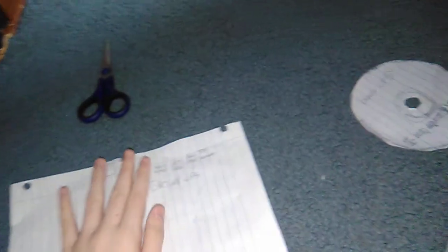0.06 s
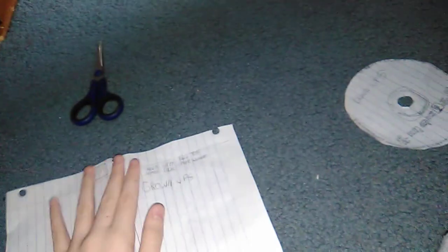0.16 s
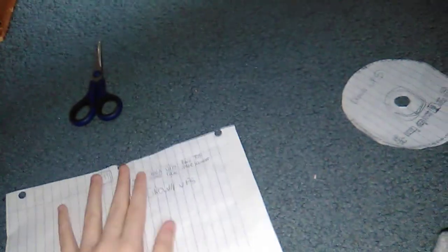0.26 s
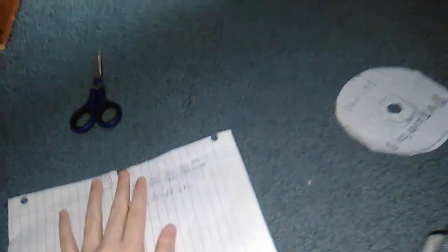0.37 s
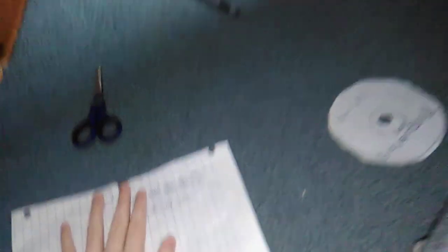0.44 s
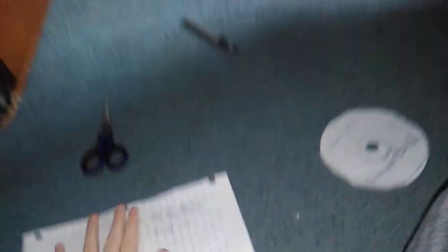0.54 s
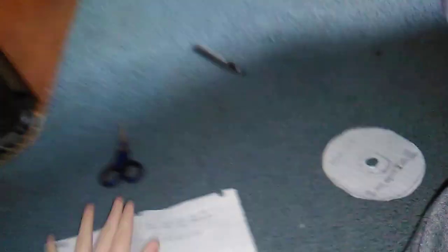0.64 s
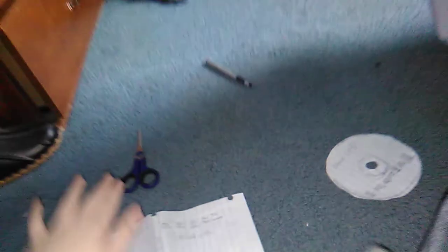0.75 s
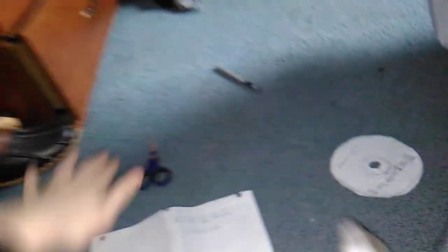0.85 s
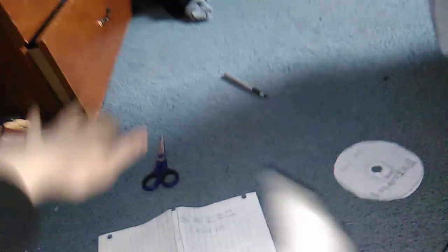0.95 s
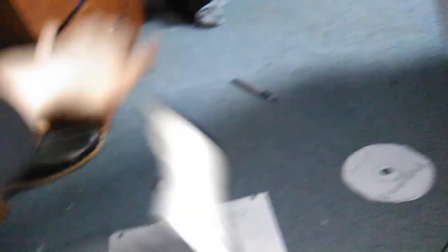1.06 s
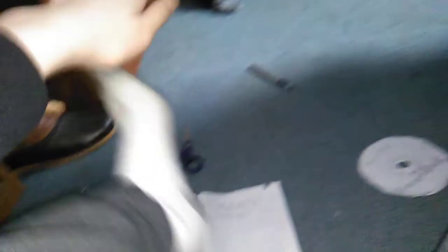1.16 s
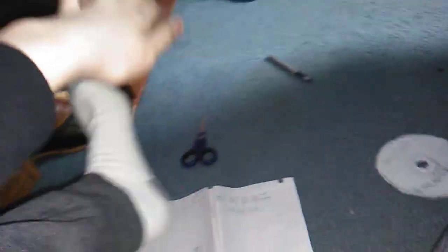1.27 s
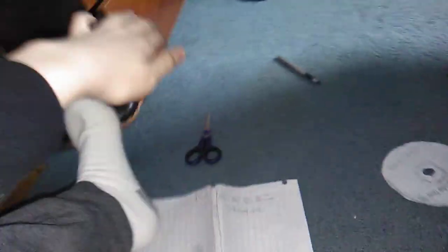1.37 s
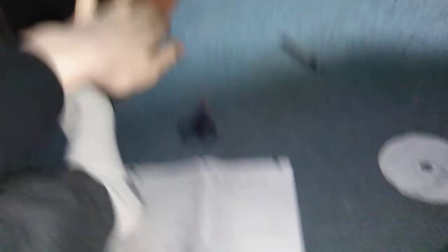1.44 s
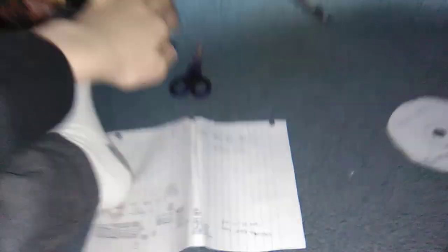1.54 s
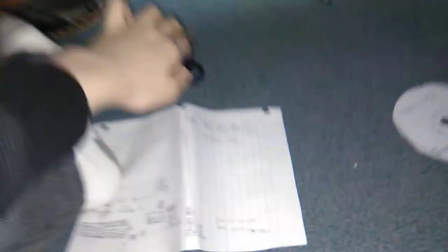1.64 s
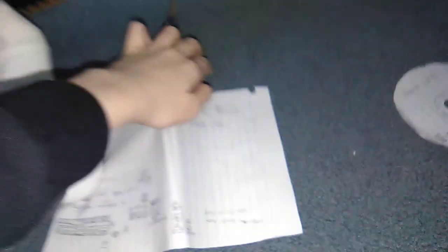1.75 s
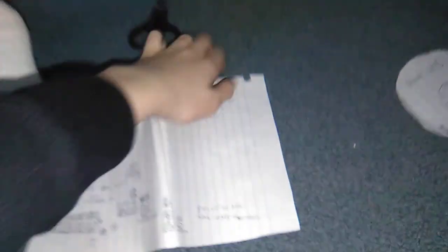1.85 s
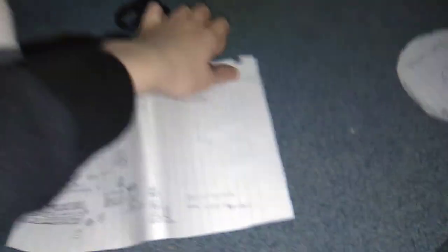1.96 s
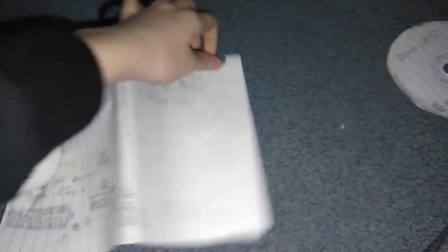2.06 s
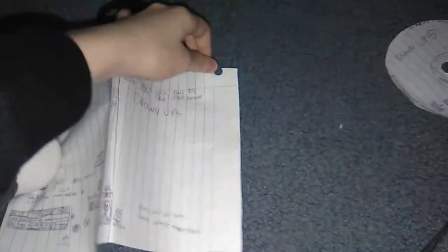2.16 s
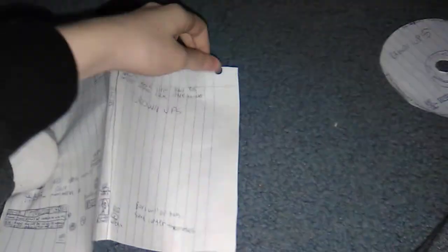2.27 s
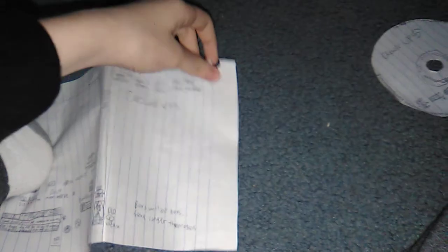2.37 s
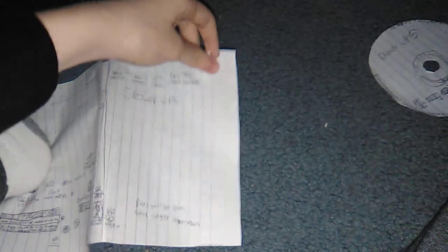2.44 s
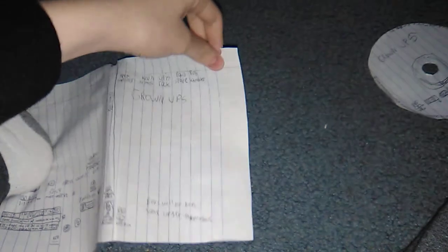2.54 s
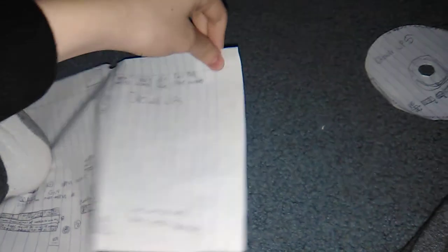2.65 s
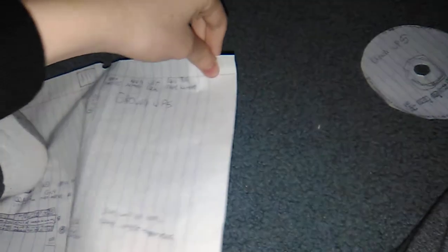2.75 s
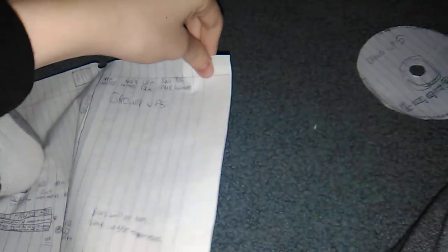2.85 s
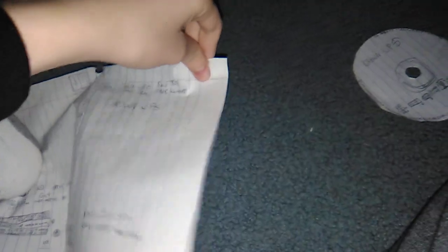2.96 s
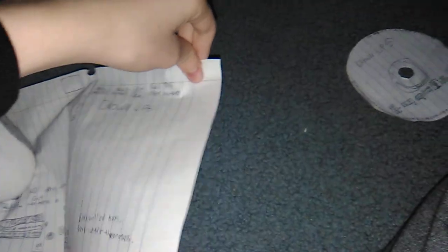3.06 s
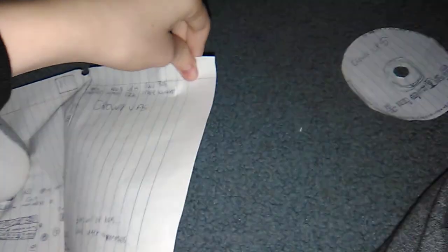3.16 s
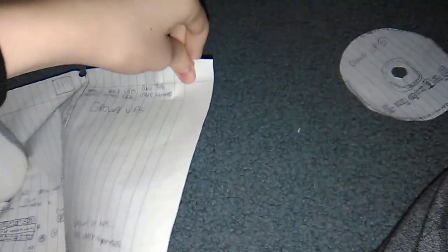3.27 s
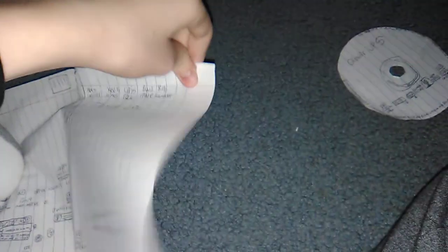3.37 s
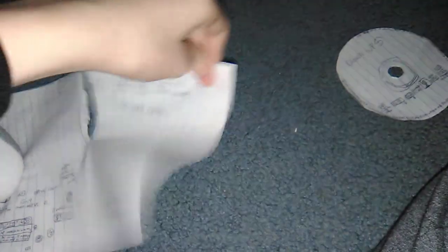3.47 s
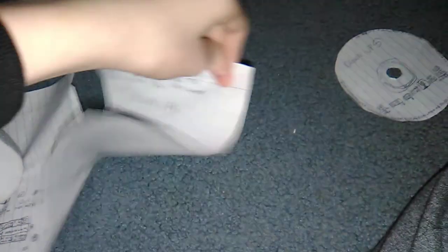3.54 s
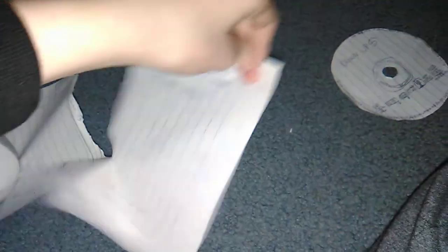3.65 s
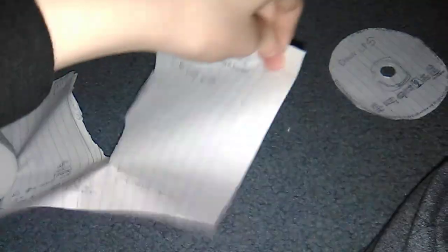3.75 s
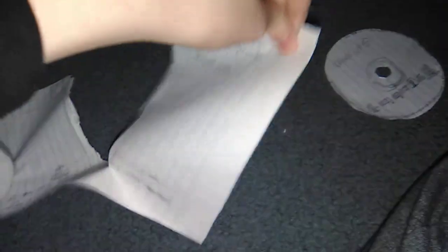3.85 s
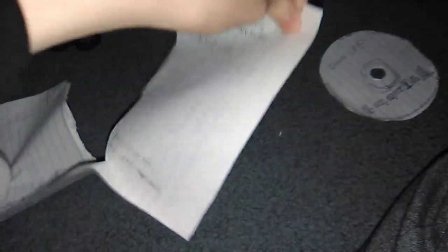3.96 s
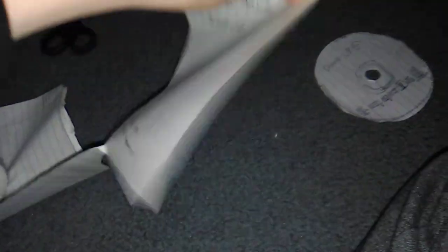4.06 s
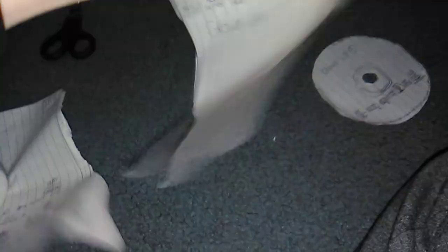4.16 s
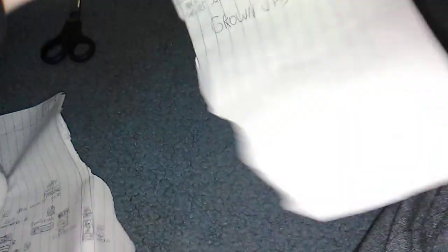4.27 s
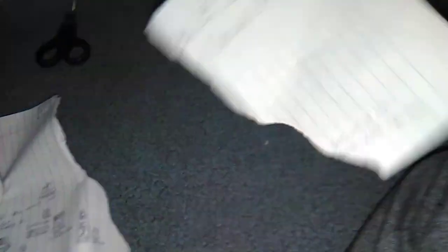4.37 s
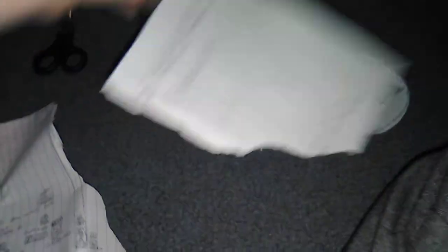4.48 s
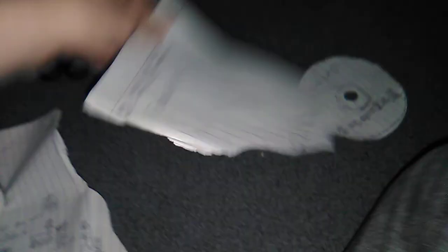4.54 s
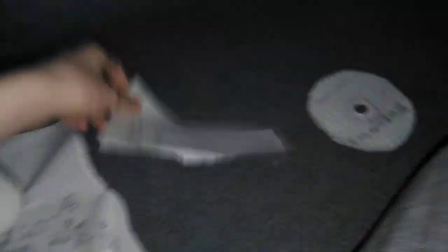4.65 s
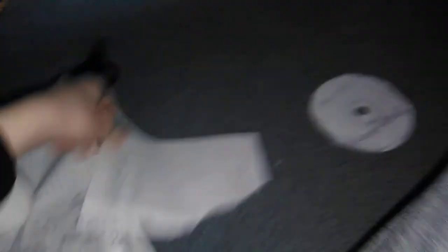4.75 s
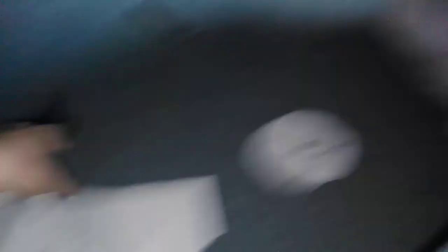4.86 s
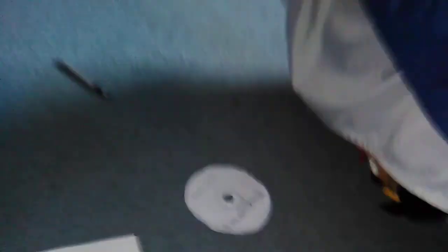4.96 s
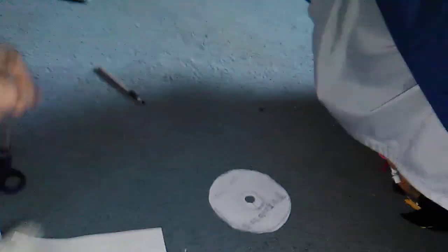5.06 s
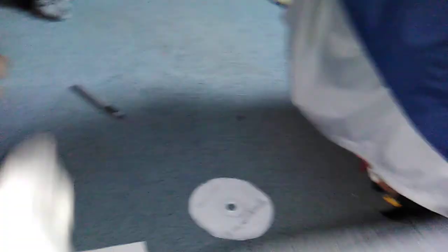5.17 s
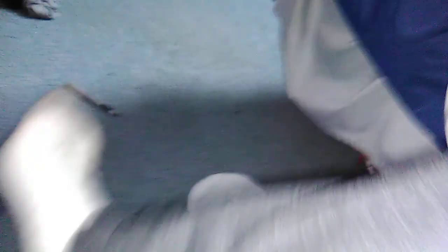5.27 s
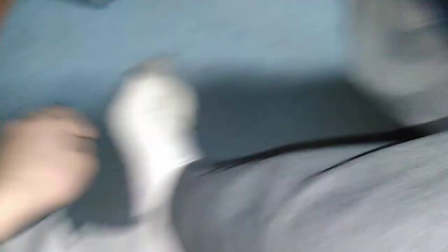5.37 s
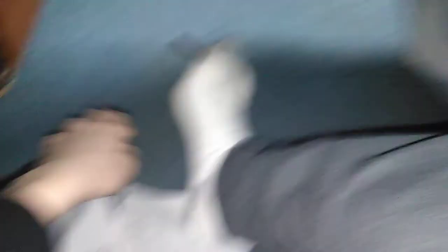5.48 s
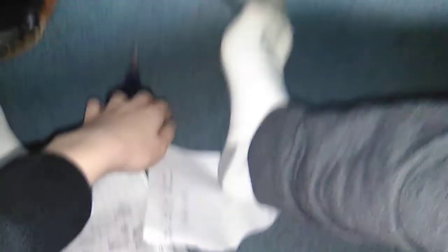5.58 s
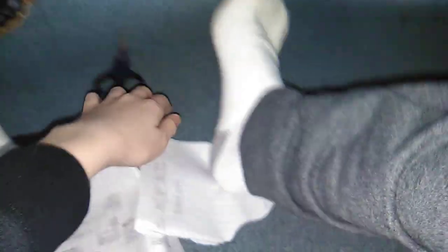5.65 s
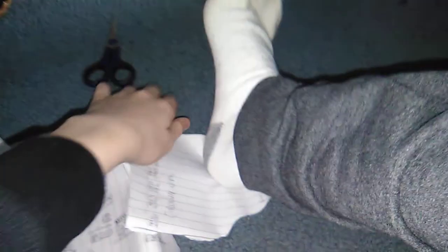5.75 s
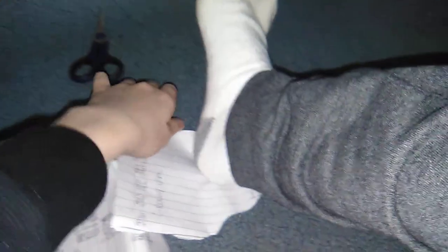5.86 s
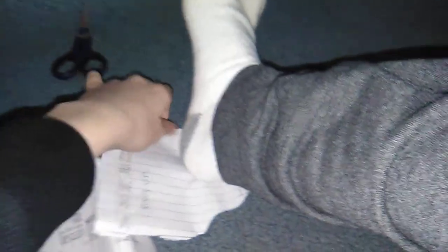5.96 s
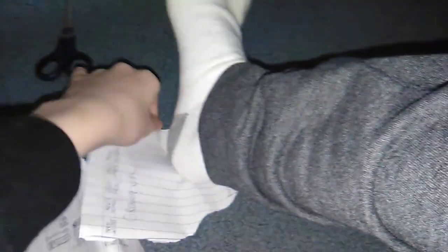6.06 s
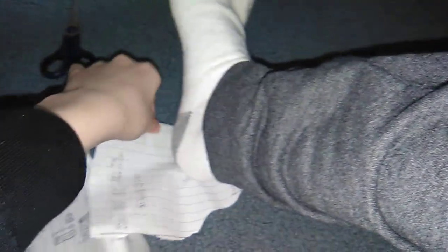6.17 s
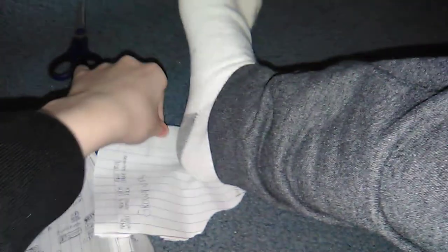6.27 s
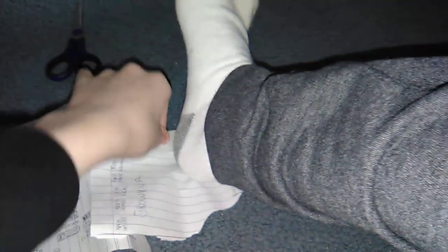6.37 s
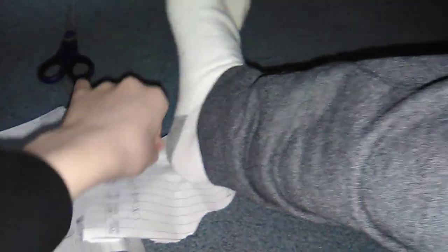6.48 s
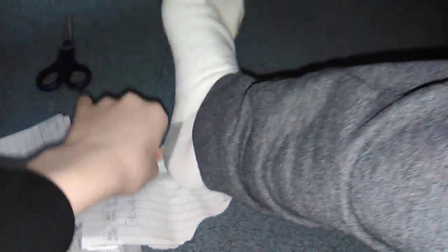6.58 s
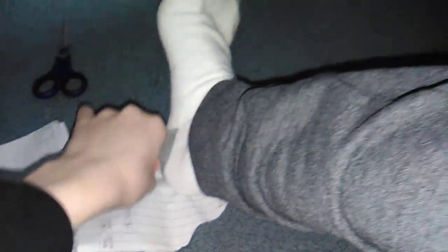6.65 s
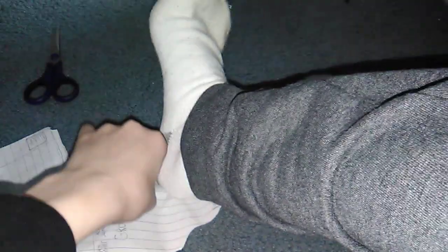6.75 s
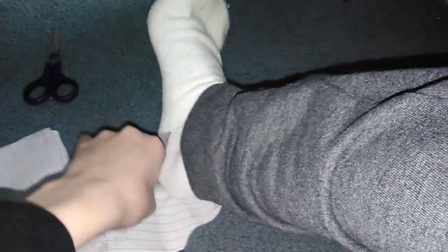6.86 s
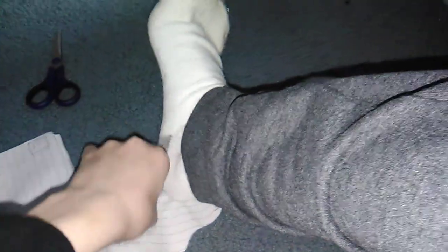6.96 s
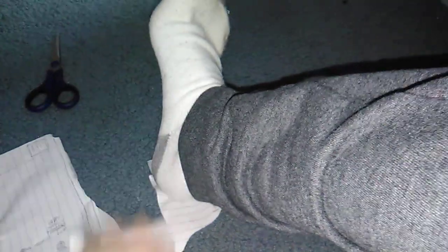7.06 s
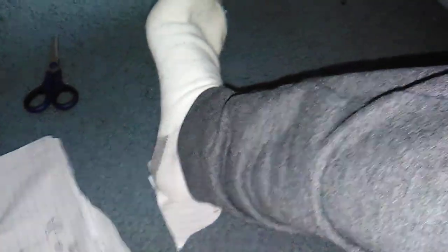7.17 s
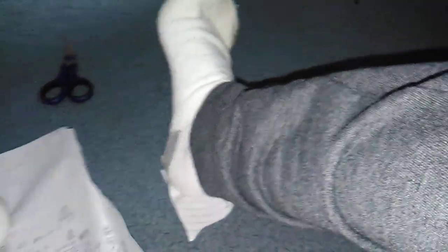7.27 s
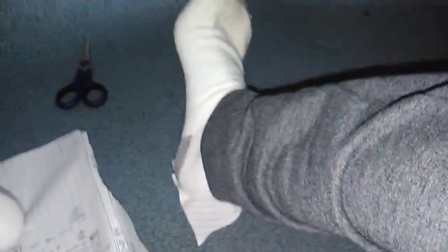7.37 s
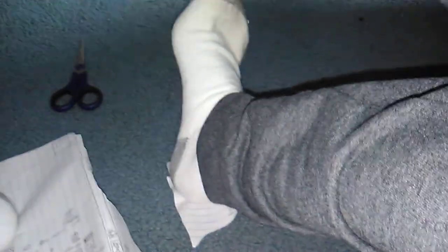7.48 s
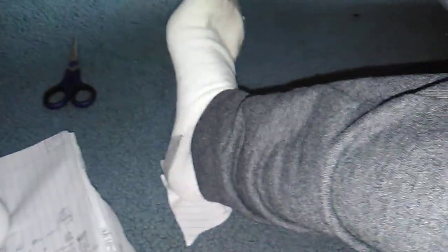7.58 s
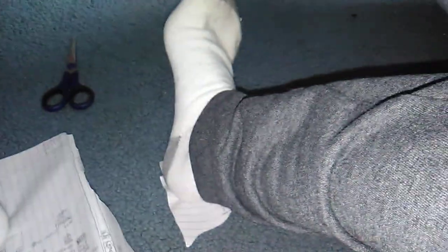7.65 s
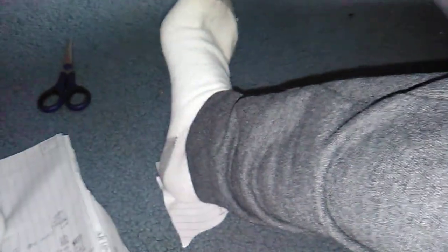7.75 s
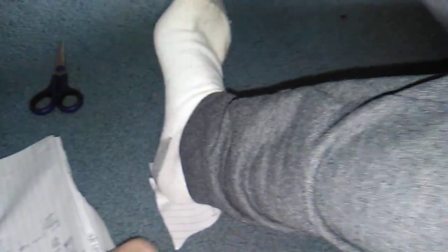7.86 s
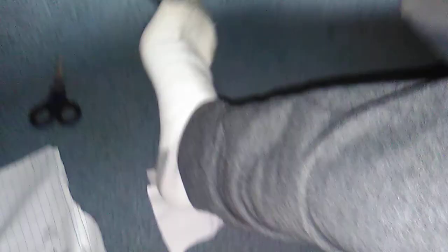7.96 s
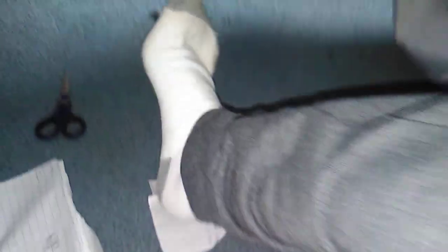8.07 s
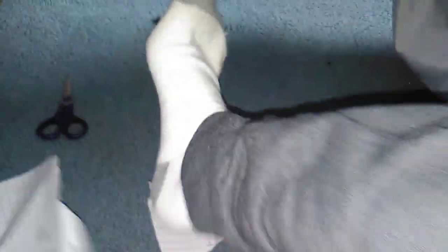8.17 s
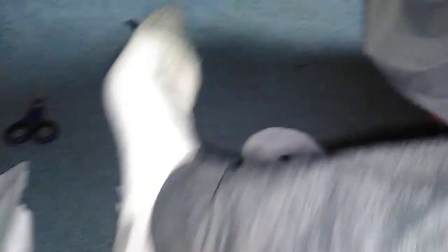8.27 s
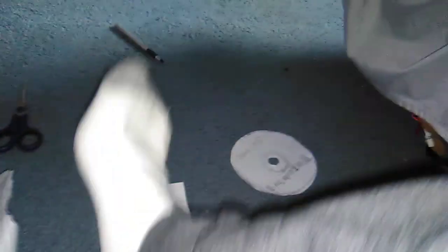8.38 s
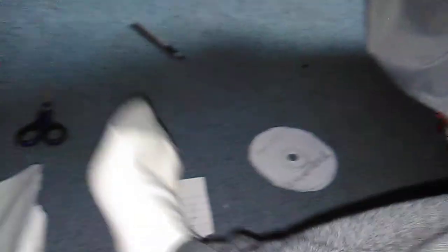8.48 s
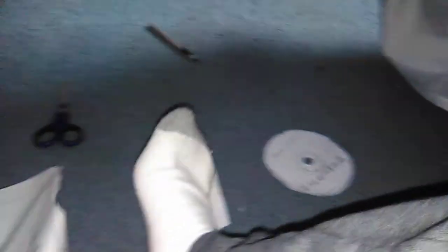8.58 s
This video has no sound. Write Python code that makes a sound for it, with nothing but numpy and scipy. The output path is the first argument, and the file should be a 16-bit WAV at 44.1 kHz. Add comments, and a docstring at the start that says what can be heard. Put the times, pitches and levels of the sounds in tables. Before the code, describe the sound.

A small quiet carpeted room, close microphone, little echo. Paper crackles briefly at 0.2-0.3 s and weakly at 0.6, then near silence with a faint low shuffle around 0.95. Light creases come at 1.5-1.8 and 2.1, thickening to crisp snaps at 2.6-2.7 and a hard bright one at 3.0. Crunches at 3.35 lead into a dense, raspy rip from about 3.5 to 4.2, strongest at first, fading in uneven ticks. Soft low air thumps, rustle and cloth rumble come at 4.7-4.9. A short scuff at 5.5, then a cluster of creases at 6.0-6.35, and separate snaps at 6.66 and 6.88. The loudest snap, at 7.04, opens a second tear lasting until about 7.4. Sparse faint crinkles follow, with little bursts at 8.3 and 8.55. Faint hiss sinks in pauses; a very quiet wavering low hum grows slightly.

```python
"""On the carpet of a quiet room a sheet of paper is gripped, shifted and torn by hand and foot, close by.
Creases snap singly as decaying partials and noise; fibres rip in dense crackle, a random train of ringing ticks.
Cloth and feet rumble as lumpy filtered noise, and flaps of air thump softly as short low pulses.
A low hum of two partials wavers, over a faint room tail and a gated hiss."""
import sys
import numpy as np
from scipy import signal
from scipy.fft import rfft, irfft, next_fast_len
from scipy.io import wavfile
from scipy.ndimage import uniform_filter1d

SR = 44100
rng = np.random.default_rng(int(sys.argv[2]) if len(sys.argv) > 2 else 0)


def to_wav(sig):
    """Store sig (one row per channel, or 1-D mono) as 16-bit WAV at the path in sys.argv[1].

    Samples outside -1..1 are clipped; the rate is SR.
    """
    pcm = np.clip(np.atleast_2d(sig), -1, 1) * 32767
    pcm = np.round(pcm).astype(np.int16)
    wavfile.write(sys.argv[1], SR, pcm.T)  # frames by channels


def rack_gain(trim_db):
    """Turn a fader trim in dB into the linear factor to multiply a signal by."""
    fader = np.asarray(trim_db, float)
    return 10 ** (fader / 20)


N = 380141
T = np.arange(N) / SR  # s
SLOW = np.arange(0, N, 32) / SR  # coarser clock for control curves, s

# creases that buckle: start_s [s], level_db [dB, peak of the bright part before tautness], pitch_hz [Hz]
SNAPS = [(0.196, -24, 4830), (0.205, -18, 3600), (0.579, -26, 4970), (0.662, -38.5, 2280),
         (0.736, -49.5, 2500), (1.535, -31.5, 2700), (1.593, -34, 3000), (1.726, -38.5, 2420),
         (1.821, -43, 4420), (2.142, -29.5, 3600), (2.406, -38.5, 2820), (2.507, -35.5, 2620),
         (2.591, -24.5, 3700), (2.658, -19, 3970), (2.67, -16, 2790), (2.771, -34.5, 2730),
         (2.975, -32.5, 2560), (3.019, -10.5, 4210), (3.03, -14, 4780), (3.199, -29, 2390),
         (3.362, -15.5, 3500), (3.555, -9.5, 4080), (3.590, -21, 2700), (3.720, -17, 2570),
         (4.002, -21, 4050), (4.212, -24.5, 6360), (4.266, -36, 3770), (4.359, -31, 2890),
         (4.444, -50, 2050), (4.547, -33.5, 2500), (4.634, -45.5, 3080), (4.683, -41.5, 2730),
         (4.749, -40, 2460), (4.819, -23.5, 5000), (4.894, -38.5, 2610), (5.956, -38, 1150),
         (5.994, -40, 2820), (6.041, -40, 2310), (6.054, -20, 2720), (6.165, -32, 2420), (6.186, -21, 2280),
         (6.198, -13, 3100), (6.214, -27, 990), (6.234, -33, 1020), (6.25, -26.5, 2390), (6.269, -36, 1830),
         (6.287, -38, 3000), (6.31, -26, 2900), (6.338, -36, 2330), (6.345, -18.5, 2870),
         (6.419, -42.5, 1070), (6.624, -48, 1500), (6.659, -16, 3840), (6.826, -39, 1270),
         (6.882, -19.5, 3800), (6.974, -36.5, 1930), (7.04, -4, 2700), (7.064, -17, 4500),
         (7.365, -29.5, 4900), (7.504, -43.5, 2580), (7.723, -35, 4940), (7.828, -46.5, 1510),
         (7.98, -41.5, 2600), (8.006, -43, 2450), (8.141, -42.5, 3360), (8.212, -26, 2220),
         (8.285, -33.5, 2350), (8.298, -31.5, 2600), (8.318, -36, 3080), (8.49, -42.5, 2430),
         (8.532, -33.5, 2540), (8.559, -37, 4380), (8.573, -26, 5040), (8.591, -36.5, 2360)]
# creases that roll over in a short crunch: start_s [s], level_db [dB], pitch_hz [Hz], length_s [s]
CRINKLES = [(0.291, -30.5, 2744, 0.044), (2.33, -31.5, 3610, 0.01), (2.383, -37, 3420, 0.008),
            (2.435, -39, 2480, 0.011), (2.629, -28, 3520, 0.011), (3.335, -29, 2960, 0.022),
            (3.405, -22.5, 3004, 0.035), (6.015, -30, 2155, 0.022), (7.294, -28.5, 2316, 0.0085),
            (7.569, -43.5, 2462, 0.052)]


def creases():
    """Buckling in succession: all single snaps, and each crinkle as six smaller snaps of scattered pitch."""
    draws = rng.random((len(CRINKLES), 6, 3))
    rows = list(SNAPS)
    for (start_s, level_db, pitch_hz, length_s), crinkle in zip(CRINKLES, draws):
        for k, (late, weak, high) in enumerate(crinkle):
            at_s = start_s + length_s * k * (0.5 + late / 2) / len(crinkle)
            rows.append((at_s, level_db - 6 * weak, pitch_hz * 1.7 ** (high - 0.5)))
    return rows


def ringing(u, pitches_hz, t60_s, phases):
    """Damped modes: patches of the sheet die away exponentially, each at its own phase (in turns)."""
    modes = sum(np.sin(2 * np.pi * (hz * u + phase)) for hz, phase in zip(pitches_hz, phases))
    return modes * rack_gain(-60 * u / t60_s)


# sheet as the microphone colours it: frequency_hz [Hz], density_db [dB per Hz, relative]
PAPER = [(90, -48.5), (150, -24), (310, -13), (590, -15.5), (1100, -5), (1700, -11), (2100, -5.5),
         (2550, -1.5), (3200, -6), (4300, -8), (5200, -9.5), (10500, -25), (14200, -29)]


def snaps():
    """Impulsive buckling: a sharp crack, a loud patch, the body of the sheet, a shiver of fibres, pushed air."""
    bright, low = np.zeros(N + SR), np.zeros(N + SR)
    u = np.arange(SR // 10) / SR
    rows = creases()
    chances = rng.random((len(rows), 6))
    fibres = rng.standard_normal((len(rows), len(u) + 1))
    for (start_s, level_db, pitch_hz), chance, noise in zip(rows, chances, fibres):
        at = slice(round(start_s * SR), round(start_s * SR) + len(u))
        force_db = level_db + 18  # strong, high snaps are the brightest
        # differenced noise is bright; summed noise is duller
        crack = pitch_hz / 2200 * np.diff(noise) * rack_gain(0.5 * force_db - 60 * u / 0.0044)
        patch = 0.79 * ringing(u, [pitch_hz], 0.0094, chance)
        body = 700 * chance[2] / pitch_hz * ringing(u, [900 * 1.3 ** chance[3]], 0.016, chance[1:])
        summed = noise[:0:-1] + noise[-2::-1]
        shiver = pitch_hz / 6000 * summed * rack_gain(0.11 * force_db - 60 * u / 0.034)
        onset = 1 - np.exp(-u / 0.00055)
        snap = coloured((crack + patch + body + shiver) * onset, PAPER)
        bright[at] += rack_gain(level_db) * snap / abs(snap).max()
        # three low partials, 190 to 456 Hz, in phase
        puff = ringing(u, 190 * 2.4 ** chance[3:], 0.023, np.zeros(3)) * np.minimum(u / 0.0078, 1)
        low[at] += rack_gain(level_db - 22 + 0.98 * force_db) * puff
    return bright[:N] + low[:N]


def rustle(level):
    """Shot noise: each breaking fibre rings a small patch, sparse ticks in gentle motion, a rasp in a tear."""
    mean_per_s = np.clip(level * 130000, 600, 3500)
    clumps = wander(55)  # the sheet gives way in fits
    per_s = mean_per_s * rack_gain(7 * clumps)
    force = rack_gain(2.9 * np.minimum(rng.exponential(1, N), 4))
    ticks = force * (rng.random(N) < per_s / SR) / np.sqrt(mean_per_s)
    patch = rng.integers(0, 32, N)
    u, grains = np.arange(800) / SR, np.zeros(N)
    for k, hz in enumerate(np.geomspace(300, 14000, 32)):
        shape = np.sin(2 * np.pi * hz * u) * rack_gain(-60 * u * hz / 22)  # small patches die sooner
        shape *= np.sqrt(hz) / np.linalg.norm(shape)
        grains += signal.oaconvolve(ticks * (patch == k), shape)[:N]
    breaking = (mean_per_s / 3500) ** 0.25  # gentle motion rubs more than it breaks
    rub = evened(rng.standard_normal(N) * rack_gain(1.1 * clumps))  # paper sliding on paper and carpet
    return evened(coloured(breaking * evened(grains) + 0.97 * rub, PAPER)) * level


def swell(peak_s, rise_s, level_db, fade_db_per_s):
    """Attack and exponential decay: a straight rise to the peak, then dying away."""
    since = SLOW - peak_s
    fade = rack_gain(level_db - fade_db_per_s * np.maximum(since, 0))
    return fade * np.clip(1 + since / max(rise_s, 0.002), 0, 1)


# hand or foot moves the sheet: peak_s [s], rise_s [s], level_db [dB, crackle], fade_db_per_s [dB/s],
# tilt_db_per_octave [dB/octave, tautness]
MOVES = [(0.001, 0.011, -46, 185.5, -2.5), (0.218, 0.036, -46, 392, 4), (0.295, 0.02, -40.5, 219, -0.5),
         (0.584, 0.061, -52, 168, 1.5), (0.95, 0.31, -74, 106, -3), (1.524, 0.021, -48, 126, 0.9),
         (1.83, 0.18, -62.5, 399, 0.2), (2.04, 0.043, -57.5, 37, 4.5), (2.145, 0.16, -54, 201, 1),
         (2.576, 0.35, -56.5, 102.5, -0.5), (2.688, 0.11, -43.5, 294, 0), (3.013, 0.1, -55, 105, 5),
         (3.045, 0.0097, -36.5, 404, 0), (3.345, 0.016, -33, 99, 2), (4.8, 0.14, -57, 90, 0),
         (4.832, 0.009, -38.5, 122.5, 0.4), (5.505, 0.048, -41, 402, -1), (6.063, 0.13, -52, 360, -0.5),
         (6.203, 0.026, -42, 185, 0), (6.341, 0.05, -51.5, 144, 0), (6.672, 0.018, -40, 302, 2),
         (6.894, 0.0076, -49.5, 163, 2.5), (7.737, 0.021, -56.5, 155, 2), (8.017, 0.071, -56, 36, 1.5),
         (8.296, 0.0042, -45, 259.5, -2), (8.56, 0.043, -47, 93, 0)]
# pull on the sheet, one list for each tear: time_s [s], level_db [dB, crackle]
TEARS = [
    [(3.468, -42.5), (3.503, -26), (3.552, -26.5), (3.578, -29.5), (3.625, -26.5), (3.64, -34),
     (3.65, -29.5), (3.716, -29.5), (3.80, -35), (3.82, -44), (3.838, -34.5), (3.918, -33.5), (3.98, -43.5),
     (4.02, -35.5), (4.076, -33), (4.094, -43.5), (4.176, -38), (4.216, -39.5), (4.328, -71.5)],
    [(7.039, -56.5), (7.058, -30), (7.235, -34.5), (7.27, -41.5), (7.399, -54.5), (7.606, -62),
     (7.714, -70)],
]
# tautness of each tear: tilt_db_per_octave [dB/octave]
TEAR_TILT = [2.6, 1.8]


def motion():
    """Power addition: crackle level of all moves and tears together, and their tilt weighted by power."""
    settle_db, settle_db_per_s = -25.5, 49  # after each move the sheet settles, faintly and slowly
    total, tilted = np.full(len(SLOW), 1e-11), 0
    for peak_s, rise_s, level_db, fade_db_per_s, tilt in MOVES:
        move = swell(peak_s, rise_s, level_db, fade_db_per_s)
        settling = swell(peak_s, rise_s, level_db + settle_db, settle_db_per_s)
        power = move ** 2 + settling ** 2
        total, tilted = total + power, tilted + tilt * power
    for pull, tilt in zip(TEARS, TEAR_TILT):
        time_s, level_db = np.transpose(pull)
        line_db = np.interp(SLOW, time_s, level_db, -200, -200)
        straight = np.interp(SLOW, time_s, rack_gain(level_db), 0, 0)
        # rises straight in amplitude, falls straight in dB
        power = np.where(np.gradient(line_db) > 0, straight, rack_gain(line_db)) ** 2
        total, tilted = total + power, tilted + tilt * power
    return np.interp(T, SLOW, np.sqrt(total)), tilted / total


def tautness(x, tilt):
    """Spectral tilt: a taut sheet sounds bright, a slack one dull, at the same power for paper's spectrum."""
    hz, t, z = signal.stft(x, SR, nperseg=256, noverlap=192)
    octaves = np.log2(np.clip(hz, 800, 9000) / 2800)
    gain = rack_gain(octaves[:, None] * np.interp(t, SLOW, tilt))
    # resonances come and go as the sheet bends
    patches = uniform_filter1d(rng.standard_normal(z.shape[::-1]), size=30, axis=0)
    patches = uniform_filter1d(patches, size=4, axis=1)
    gain *= rack_gain(2 * evened(patches.T))
    share = rack_gain(read(PAPER, hz))[:, None] ** 2
    gain /= np.sqrt((share * gain ** 2).sum(0) / share.sum())
    return signal.istft(z * gain, SR, nperseg=256, noverlap=192)[1][:N]


# cloth and feet on carpet: frequency_hz [Hz], density_db [dB per Hz, relative]
CARPET = [(35, -20), (110, -6), (430, -0.5), (1000, -14), (2500, -51.5)]
# the body shifts its weight on the carpet: peak_s [s], rise_s [s], level_db [dB], fade_db_per_s [dB/s]
SHIFTS = [(0.952, 0.11, -58.5, 196.5), (2.65, 0.085, -52.5, 79), (3.038, 0.11, -55, 192.5),
          (4.85, 0.065, -51, 88), (6.22, 0.87, -66, 36.5)]


def shuffle(level):
    """Modulated friction noise: the lumpy low rumble of cloth and feet."""
    drag_db, still_db = -16, -86.5  # rumble relative to the crackle that drags it along; rumble at rest
    lumps = coloured(rng.standard_normal(N), CARPET) * rack_gain(8.6 * np.tanh(wander(26)))
    shifting = np.interp(T, SLOW, sum(swell(*row) ** 2 for row in SHIFTS))
    power = shifting + (rack_gain(drag_db) * level) ** 2 + rack_gain(still_db) ** 2
    return evened(lumps) * np.sqrt(power)


# the sheet flaps air at the microphone: start_s [s], level_db [dB, height of the envelope]
THUMPS = [(4.728, -51.5), (4.764, -54), (4.89, -45), (4.926, -43.5)]


def thumps():
    """Pressure pulse: one soft low push and pull each, a 110 Hz sine under a bell-shaped envelope."""
    out = np.zeros(N)
    for start_s, level_db in THUMPS:
        u = T - start_s
        out += rack_gain(level_db) * np.sin(2 * np.pi * 110 * u) * np.exp(-(u / 0.0053 - 1) ** 2)
    return out


# low hum: time_s [s], pitch_hz [Hz, before wavering], level_db [dB, lower partial before wavering]
HUM = [(0, 61.94, -82.5), (6.299, 57.83, -72.5), (8.62, 64.5, -68)]


def hum():
    """Frequency and amplitude modulation: two low harmonic partials waver in pitch and strength."""
    time_s, pitch_hz, level_db = np.transpose(HUM)
    hz = np.interp(T, time_s, pitch_hz) * (1 + 0.0048 * wander(11))
    phase = 2 * np.pi * np.cumsum(hz) / SR
    lower = np.sin(phase) * rack_gain(8.9 * np.tanh(wander(5.5)))
    upper = 0.49 * np.sin(2 * phase) * rack_gain(4.8 * wander(4.8))
    return rack_gain(np.interp(T, time_s, level_db)) * (lower + upper)


# decay of the room: frequency_hz [Hz], t60_s [s]
ROOM = [(250, 0.22), (14000, 0.024)]


def room(x):
    """Reverberation: sparse reflections, each band dying at its own speed."""
    taps = np.zeros(SR // 2)
    at = np.arange(120, len(taps) - 20, 20)
    taps[at + rng.integers(0, 20, len(at))] = rng.choice([-1., 1.], len(at))
    hz, t, z = signal.stft(taps, SR, nperseg=128)
    decay = rack_gain(-60 * t / read(ROOM, hz)[:, None])
    tail = signal.istft(z * decay, SR, nperseg=128)[1]
    return signal.oaconvolve(x, tail / np.linalg.norm(tail))[:N]


# room and microphone hiss: frequency_hz [Hz], density_db [dB per Hz, relative]
AIR = [(30, -22), (101, -13.5), (134, -19.5), (999, -32.5), (14200, -39.5)]


def air(paper):
    """Gated noise floor: hiss that sinks by up to 9 dB once the paper has been quiet for about 0.1 s."""
    open_db = -70.5  # rms of the hiss with the gate open
    recent = uniform_filter1d(paper ** 2, SR // 8, origin=SR // 17)  # mostly past power
    busy_db = 10 * np.log10(abs(recent) + 1e-12)
    gate_db = np.clip(busy_db - open_db, -9, 0)
    return rack_gain(open_db + gate_db) * evened(coloured(rng.standard_normal(N), AIR))


def evened(x):
    """Power normalisation: rms 1."""
    return x / np.sqrt(np.mean(abs(x) ** 2) + 1e-20)


def read(points, hz):
    """Logarithmic pitch scale: interpolates a table of (Hz, value) on a log axis."""
    f, value = np.transpose(points)
    return np.interp(np.log(hz + 1), np.log(f + 1), value)


def coloured(x, points):
    """Minimum-phase filtering: a causal filter of unit energy with the given spectrum."""
    level_db = np.maximum(read(points, abs(np.fft.fftfreq(4096, 1 / SR))), -100)
    log_gain = np.log(rack_gain(level_db))
    taps = np.fft.ifft(np.exp(np.conj(signal.hilbert(log_gain)))).real[:2048]
    return signal.oaconvolve(x, taps / np.linalg.norm(taps))[:len(x)]


def wander(hz):
    """Low-passed random fluctuation of rms 1, its amplitude halved at about twice the given frequency."""
    z = rfft(rng.standard_normal(next_fast_len(N)))
    f = np.arange(len(z)) * SR / N
    return evened(irfft(z / (1 + (f / 2 / hz) ** 2))[:N])


def scene():
    """Superposition at one point of hearing: all sources add, and both channels are alike."""
    level, tilt = motion()
    paper = tautness(snaps() + rustle(level), tilt)
    reflected = rack_gain(-16.5) * room(paper)
    mix = paper + reflected + shuffle(level) + thumps() + hum() + air(paper)
    return np.tile(mix, (2, 1))


def roll_off(x):
    """The treble ends steeply here."""
    return signal.sosfilt(signal.butter(12, 15600, fs=SR, output="sos"), x)


# treble patches unlike left and right: frequency_hz [Hz], share [0 to 1]
APART = [(4600, 0.0032), (8000, .4), (15000, 0.85)]


def record(dry):
    """Band limiting and decorrelation: scattered steady treble patches become separate hiss in each channel."""
    edge = signal.firwin(255, 14350, window=("kaiser", 5), fs=SR)
    limited = signal.oaconvolve(dry, edge[None], "same")
    hz, t, z = signal.stft(limited, SR, nperseg=512, noverlap=384)
    cells = rng.random((len(hz) // 14 + 1, len(t) // 10 + 1))
    cells = cells.repeat(14, 0).repeat(10, 1)[:len(hz), :len(t)]
    high = hz > 4000
    treble = (abs(z[0, high]) ** 2).sum(0) + 1e-14
    steady = np.roll(treble, -2) < 8 * np.roll(treble, 2)  # no attack here
    apart = (cells < read(APART, hz)[:, None]) & steady & high[:, None]
    power = uniform_filter1d(uniform_filter1d(abs(z) ** 2, 7, axis=1), 3, axis=2)
    hiss = signal.stft(rng.standard_normal(dry.shape), SR, nperseg=512, noverlap=384)[2]
    z = np.where(apart, np.sqrt(abs(power)) * evened(hiss), z)
    mix = signal.istft(z, SR, nperseg=512, noverlap=384)[1][:, :N]
    return roll_off(mix)


dry = scene()
out = record(dry)
to_wav(out)
```